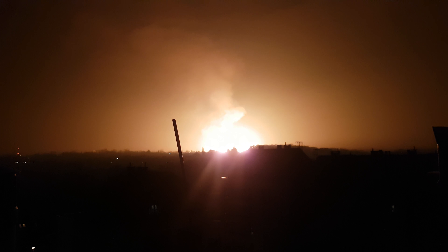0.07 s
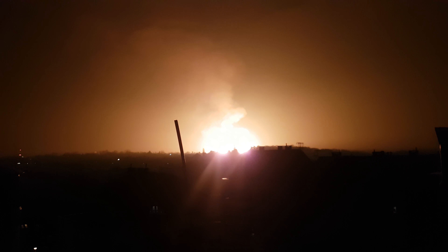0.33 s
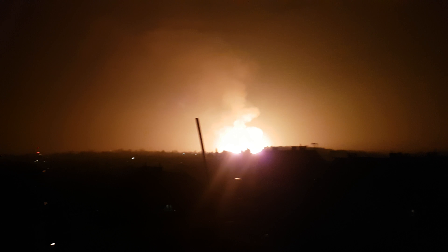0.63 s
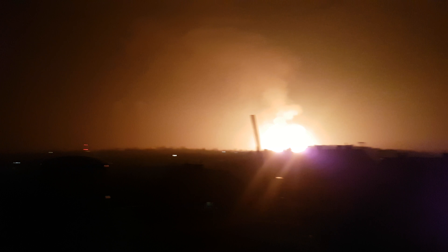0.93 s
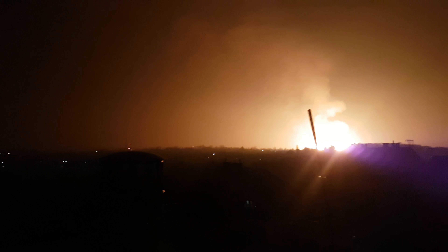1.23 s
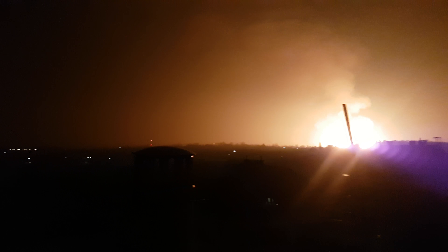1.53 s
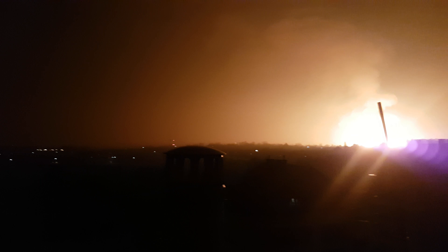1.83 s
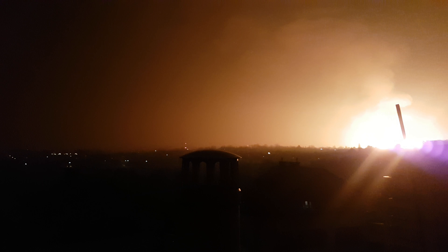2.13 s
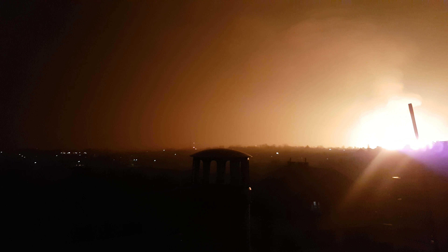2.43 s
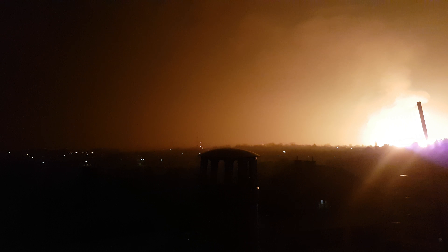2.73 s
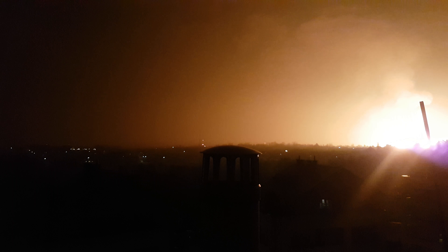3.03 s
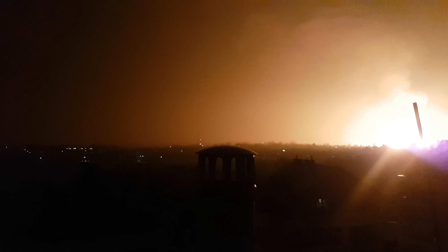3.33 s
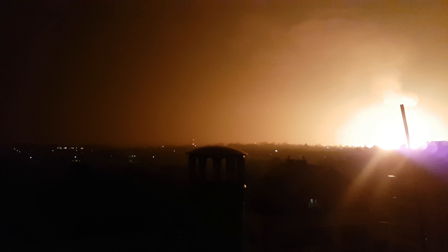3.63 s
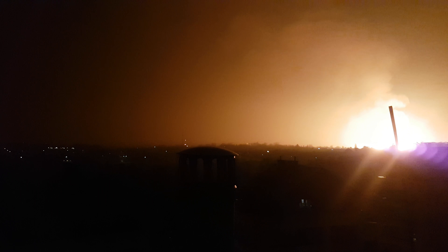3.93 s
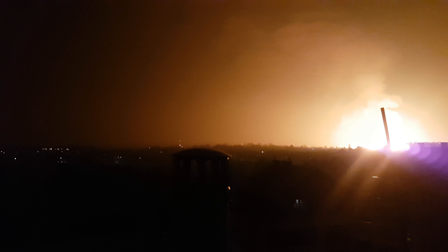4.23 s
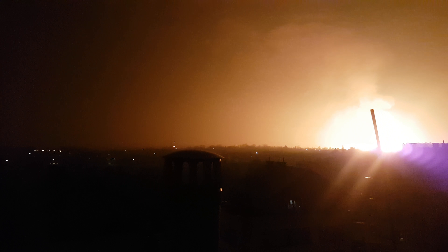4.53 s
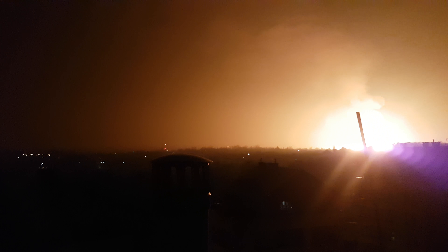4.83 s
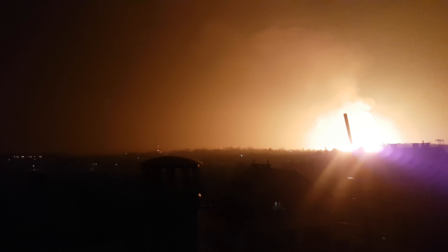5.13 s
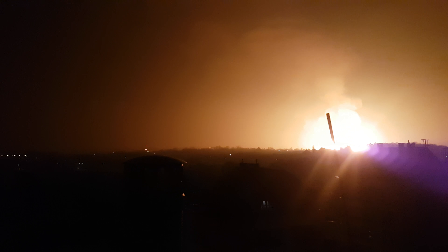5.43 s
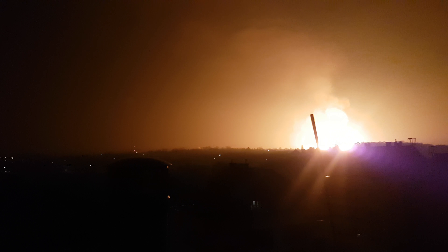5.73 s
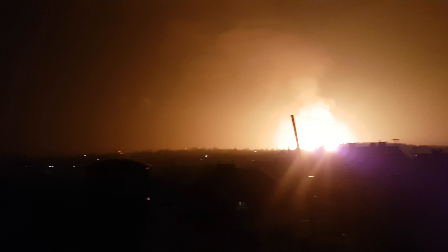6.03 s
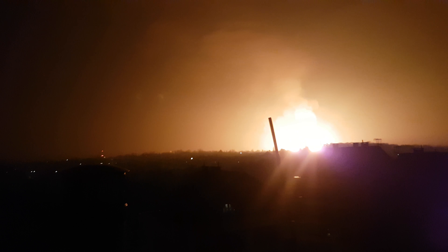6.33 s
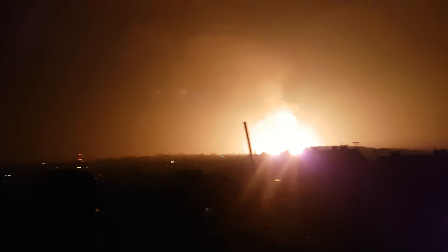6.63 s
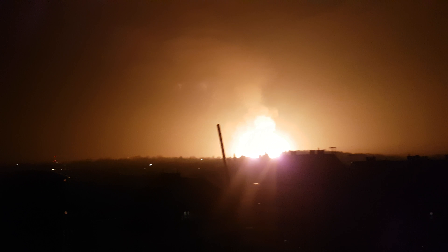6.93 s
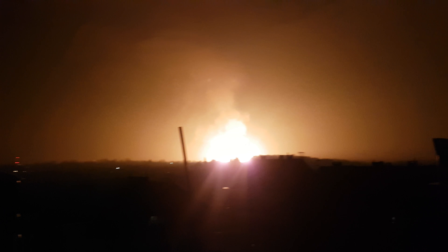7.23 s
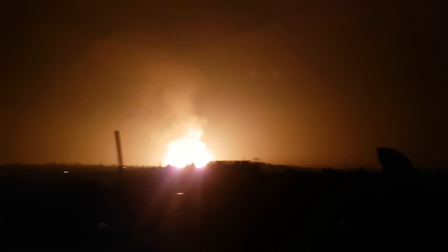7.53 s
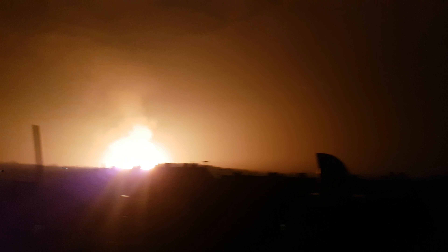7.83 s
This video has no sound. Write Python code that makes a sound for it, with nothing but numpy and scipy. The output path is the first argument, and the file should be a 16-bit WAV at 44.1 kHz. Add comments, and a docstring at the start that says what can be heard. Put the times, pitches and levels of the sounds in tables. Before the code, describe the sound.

Outdoors at night, a hand-held phone picks up the steady, muffled roar of a large distant blaze, with a low rumble beneath it. The sound drifts slightly right as fingers rub very faintly on the case. In the second half the rumble swells and the fire grows louder, moving back toward the left, while brief puffs of wind bump the microphone.

```python
"""A huge fire far off at night, on a hand-held phone with two microphone ports 15 cm apart.
From the start: deep rumble, turbulent roar and a rush the air has robbed of treble, scattered by the town,
with a hollow echo off a surface close by and faint microphone hiss. Air nudges the right port, fingers rub
the case, and the phone pans so the fire drifts right. From about 4 s it swings back and the rush lifts;
from 5.4 s the rumble surges. Stronger puffs hit the port near the end, as the fire passes to the left."""
import sys
import numpy as np
from scipy import signal
from scipy.fft import rfft, irfft, next_fast_len
from scipy.io import wavfile
from scipy.ndimage import map_coordinates

SR = 44100
rng = np.random.default_rng(int(sys.argv[2]) if len(sys.argv) > 2 else 0)


def unload_audio(sound):
    """Save the sound as a 16-bit wav file, at the path given as the first command line argument."""
    columns = np.transpose(np.atleast_2d(sound))
    # keep every value between -1 and 1, then stretch to whole-number steps
    steps = np.round(np.clip(columns, -1, 1) * 32767)
    wavfile.write(sys.argv[1], SR, steps.astype(np.int16))


N = 356328
T = np.arange(N) / SR

# strength of the fire from where we stand: (time [s], level [dB])
FIRE_STRENGTH = [(0.0, -30.5), (0.9, -29), (1.7, -31), (2.6, -31), (3.4, -31.5), (4.5, -32), (5.15, -29.5),
                 (5.8, -30.5), (6.4, -28.5), (7.1, -29), (8.08, -27)]
# the phone's aim: (time [s], bearing of the fire to the right [deg], lag of the near echo [ms])
PHONE_POSE = [(0, -2.5, 1.66), (.8, 6, 1.69), (1.5, 18, 1.75), (2.3, 25.5, 1.74), (3.4, 26.5, 1.83),
              (4.5, 22, 1.654), (5.5, 10.5, 1.702), (7.2, 0.5, 1.7), (8.08, -25, 1.48)]
# the flame's voices at this distance: (frequency [Hz], relative density [dB])
RUMBLE_SPECTRUM = [(15, -28.5), (35, -27.5), (60, -14), (100, -2.5), (160, 1), (200, 0), (240, 1),
                   (300, -10.5), (450, -28)]
BOOM_SPECTRUM = [(15, -13.5), (40, -11), (65, -2.5), (95, 5), (140, -14.5), (250, -42.5)]
ROAR_SPECTRUM = [(150, -30.5), (270, -10), (340, -0.5), (420, 2.5), (560, 0.5), (700, 2), (850, -3.5),
                 (1100, -19.5), (1600, -52)]
RUSH_SPECTRUM = [(500, -24), (800, -2.5), (1000, 0.5), (1300, 1.5), (1700, -6), (2000, -15.5), (2400, -30),
                 (2800, -43), (3300, -56.5), (4500, -72)]
# a hollow hump drifting inside the roar: (time [s], centre [Hz])
HOLLOW_CENTRE = [(0, 565), (1.1, 510), (3.5, 600), (5.3, 612), (6, 590), (6.6, 500), (7.2, 590),
                 (8.08, 665)]
# brief flares of the roar: (time [s], length [s], lift [dB])
ROAR_FLARES = [(2.101, 0.097, 2.5), (2.404, 0.03, 3), (6.546, 0.14, 0.4)]
# very big eddies within the surge: (time [s], length [s], relative level [dB])
BOOM_SWELLS = [(6.347, .65, -46), (7.953, .42, -42.5)]
# sound scattered by the town: (frequency [Hz], level against the straight path [dB])
TOWN_SCATTER = [(50, -12.5), (150, -23.5), (300, -2), (550, -12.5), (850, -3), (1150, -4.5), (1600, -3),
                (2100, 6), (3000, 9)]
# the hand's shadow on the left port: (frequency [Hz], gain [dB])
HAND_SHADE = [(100, -1), (320, -1), (520, -3), (900, -1.5), (1250, -4), (1800, -7), (2600, -2)]
# noises right at the microphones: (frequency [Hz], relative density [dB])
HISS_SPECTRUM = [(100, -6), (3500, 0), (5000, -3), (7000, -7), (9500, -9.5), (12000, -5.5), (15500, -2)]
BUFFET_SPECTRUM = [(15, -9), (40, -5), (75, 4.5), (120, 3.5), (200, -10), (400, -38.5)]
RUB_SPECTRUM = [(2000, -16.5), (3300, -0.5), (5000, -1), (6200, -10), (9000, -14.5), (15000, -26)]
# the strongest puffs on the right port: (time [s], length [s], level [dB])
AIR_PUFFS = [(.39, .07, -52), (0.567, .16, -50.5), (2.42, .063, -51), (6.59, .2, -38), (6.716, 0.052, -35),
             (7.68, 0.041, -26.5)]
# fingers sliding on the case: (time [s], length [s], relative level [dB], left minus right [dB])
FINGER_RUBS = [(0.447, .2, -75, 8), (0.878, 0.3, -75.5, 11), (1.75, 0.28, -75, 11.5), (1.888, .006, -63, 8),
               (2.73, 0.29, -74, 5.5), (6.07, 0.0215, -75, -15), (6.351, 0.1, -78.5, 12),
               (7.267, .024, -77, -7)]
# thin squeaks of the grip: (time [s], length [s], pitch [Hz], relative level [dB])
GRIP_SQUEAKS = [(0.58, 0.37, 7800, -82), (1.453, 0.25, 5000, -79.5), (1.757, 0.28, 5010, -74.5),
                (5.316, .025, 3330, -73)]


def undb(db):
    """Decibels to gain."""
    return 10 ** (np.asarray(db) / 20)


def curves(table):
    """The columns of a table of times, joined by straight lines."""
    times, *columns = np.transpose(table)
    return [np.interp(T, times, column) for column in columns]


def rise(start_s, length_s):
    """A straight rise from 0 to 1 that then holds."""
    return np.clip((T - start_s) / length_s, 0, 1)


def swell(peak_s, length_s):
    """A bell-shaped rise and fall."""
    return np.exp(-2 * ((T - peak_s) / length_s) ** 2)


def noise(spectrum):
    """Noise of rms 1 with the given colour, dying away above its last point."""
    hz, db = np.transpose(spectrum)
    size = next_fast_len(N, real=True)
    f = np.arange(1, size // 2) * SR / size
    f = f[f < 2 * hz[-1]]
    gain = undb(np.interp(np.log(f), np.log(hz), db)) * np.minimum(2 - f / hz[-1], 1)
    white = rng.standard_normal(size).view(complex)[:len(f)]
    x = irfft(white * gain, size)[:N]
    return x / x.std()


def walk(rate_hz):
    """A smooth random wander of spread 1 that changes about rate_hz times a second."""
    return noise([(rate_hz / 4, 0), (rate_hz, -6), (4 * rate_hz, -24)])


def narrow_band(hz, width_hz):
    """A narrow band of noise of rms 1 whose centre may move."""
    phase = 2 * np.pi * np.cumsum(hz * np.ones(N)) / SR
    return walk(width_hz) * np.cos(phase) + walk(width_hz) * np.sin(phase)


def colour(x, spectrum):
    """Filter by a table of (frequency [Hz], gain [dB])."""
    hz, db = np.transpose(spectrum)
    size = next_fast_len(N, real=True)
    f = np.maximum(np.arange(size // 2 + 1) * SR / size, 1)
    gain = undb(np.interp(np.log(f), np.log(hz), db))
    return irfft(rfft(x, size) * gain, size)[..., :N]


def delay(x, lag_s):
    """The sound delayed by a moving lag."""
    return map_coordinates(x, [(T - lag_s) * SR], order=1, mode="mirror")


def rumble(strength_db, paths, surge_s=5.38):
    """Big eddies in the flame: they ebb slowly, then surge and keep growing, with two deep booms."""
    ebb_db = 0.64 * np.minimum(T, surge_s)
    surge_db = 8.5 * rise(surge_s, length_s=.7) + 1.5 * np.maximum(T - surge_s, 0)
    level = undb(-42.5 + .65 * strength_db - ebb_db + surge_db + 1.1 * walk(6.8))
    booms = sum(undb(db) * swell(s, length) for s, length, db in BOOM_SWELLS)
    return np.array([level * noise(RUMBLE_SPECTRUM) + booms * noise(BOOM_SPECTRUM) for _ in range(paths)])


def roar(strength_db, bearing_deg, paths):
    """Smaller eddies churn and flare; a hollow hump, strongest on axis, drifts and slowly wanes."""
    hollow_hz, = curves(HOLLOW_CENTRE)
    hollow = undb(-0.08 * np.abs(bearing_deg) - T)  # wanes 1 dB a second
    flare_db = sum(db * swell(s, length) for s, length, db in ROAR_FLARES)
    level = undb(-30.5 + 1.22 * strength_db + flare_db + .5 * walk(17)) / np.sqrt(1 + hollow ** 2)
    waves = [noise(ROAR_SPECTRUM) + hollow * narrow_band(hollow_hz, width_hz=92) for _ in range(paths)]
    return level * np.array(waves)


def rush(strength_db, bearing_deg, paths):
    """Small eddies flutter, dulled by the long way through the air; they lift ahead of the rumble."""
    lift_db = 2 * rise(start_s=3.74, length_s=2.3)
    off_axis_db = 0.0188 * np.abs(bearing_deg)
    level = undb(-35 + .45 * strength_db - off_axis_db + lift_db + 0.56 * walk(30))
    return level * np.array([noise(RUSH_SPECTRUM) for _ in range(paths)])


def near_echo(ports, bearing_deg, echo_ms):
    """A surface close by cuts a sliding comb of notches, deeper as the phone swings towards it."""
    lags_ms = echo_ms + 0.13, echo_ms  # the left port is further from the surface
    bounced = np.array([delay(x, ms / 1000) for x, ms in zip(ports, lags_ms)])
    share = 0.41 - 0.0033 * bearing_deg
    return (ports + share * bounced) / np.sqrt(1 + share ** 2)


def distant_fire(usual_db=-30, port_spacing_m=0.15, port_skew_deg=12):
    """The flame at the two ports: straight, scattered across the town and off the near surface."""
    bearing_deg, echo_ms = curves(PHONE_POSE)
    strength_db = curves(FIRE_STRENGTH)[0] - usual_db
    paths = 3  # unrelated waves: one straight, and one scattered to each port
    straight, *scattered = (rumble(strength_db, paths) + roar(strength_db, bearing_deg, paths)
                            + rush(strength_db, bearing_deg, paths))
    # the left port hears it later when the fire stands to the right
    extra_path_m = port_spacing_m * np.sin(np.radians(bearing_deg + port_skew_deg))
    direct = np.array([delay(straight, extra_path_m / 343), straight])
    town = colour(np.array(scattered), TOWN_SCATTER)  # short waves scatter more
    left, right = near_echo(direct + town, bearing_deg, echo_ms)
    left = colour(left, HAND_SHADE) * undb(1.2 - 0.12 * T)  # the hand creeps over this port
    return np.array([left, right]) * undb(1.0)


def microphone_hiss():
    """Each microphone's own faint noise floor."""
    return np.array([noise(HISS_SPECTRUM), noise(HISS_SPECTRUM)]) * undb(-69.5)


def wind_on_port():
    """Small eddies and a few stronger puffs press on the right port and barely reach the left."""
    puffs = sum(undb(db) * swell(s, length) for s, length, db in AIR_PUFFS)
    calm_db = 14.5 * rise(start_s=3.9, length_s=.3)  # the air between puffs falls calm
    eddies = undb(-61 + 5 * walk(8) - calm_db)
    return noise(BUFFET_SPECTRUM) * (puffs + eddies) * undb([[-20], [0]])


def handling_noise():
    """Skin catches and slips on the case in faint, uneven rubs and squeaks, mostly by the left port."""
    slides = sum(undb(db + np.array([[pan], [-pan]]) / 2) * swell(s, length)
                 for s, length, db, pan in FINGER_RUBS)
    squeaks = sum(undb(db) * swell(s, length) * narrow_band(hz, width_hz=220)
                  for s, length, hz, db in GRIP_SQUEAKS)
    grip_shift = undb(-84 + 7 * walk(12)) * swell(peak_s=8, length_s=1.1)  # as the phone swings back
    rubs = (slides + grip_shift) * np.array([noise(RUB_SPECTRUM), noise(RUB_SPECTRUM)])
    catch_and_slip = undb(-4.5 + 2.5 * walk(60))
    return (rubs + squeaks * undb([[1], [-5]])) * catch_and_slip


def scene():
    """The fire in the distance, with the small sounds right at the microphones."""
    return distant_fire() + microphone_hiss() + wind_on_port() + handling_noise()


def record(dry):
    """The phone cuts the top steeply above 15.7 kHz."""
    return signal.sosfilt(signal.ellip(10, .1, 80, 15720, fs=SR, output="sos"), dry)


dry = scene()
out = record(dry)
unload_audio(out)
```